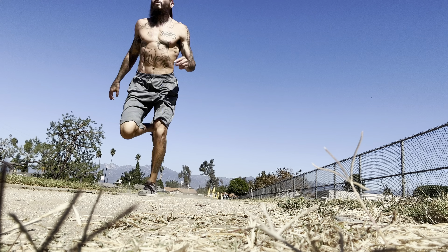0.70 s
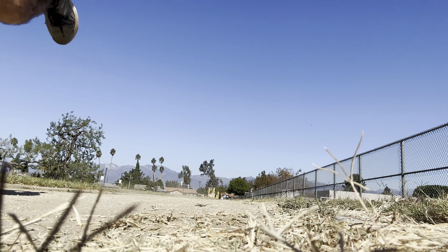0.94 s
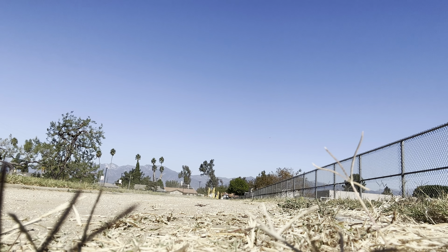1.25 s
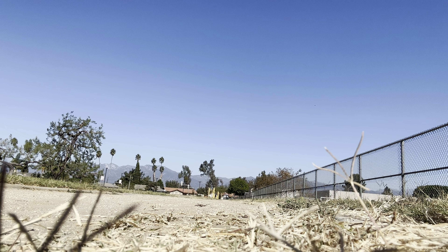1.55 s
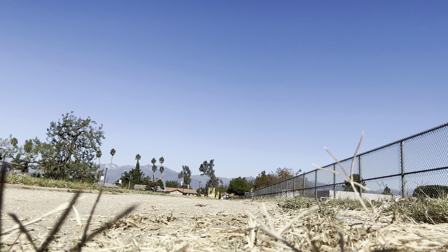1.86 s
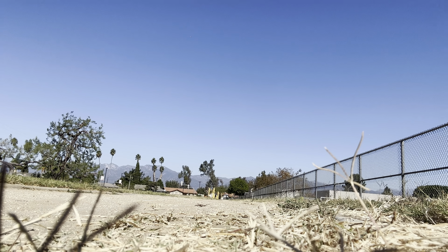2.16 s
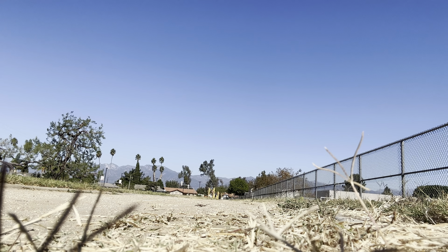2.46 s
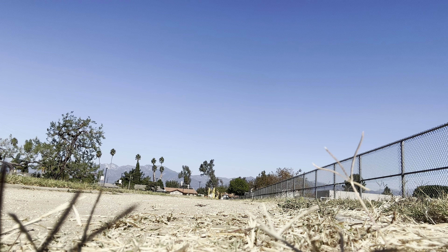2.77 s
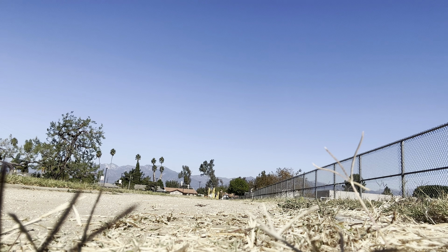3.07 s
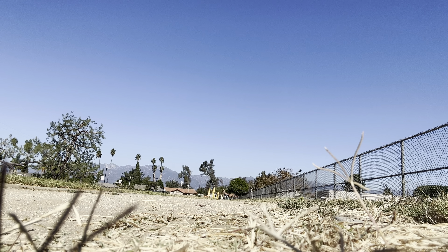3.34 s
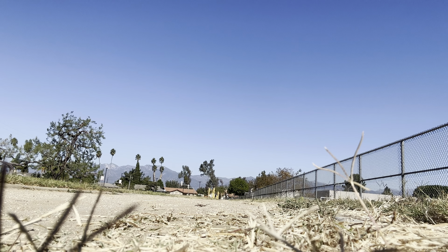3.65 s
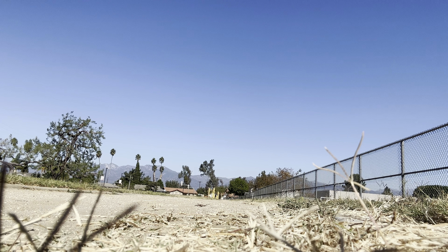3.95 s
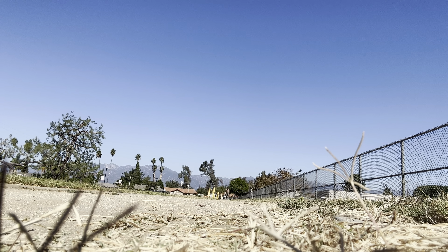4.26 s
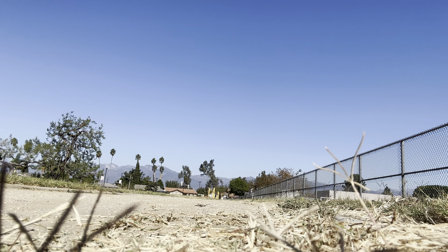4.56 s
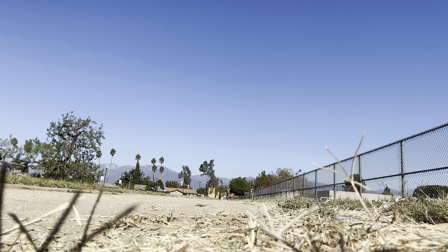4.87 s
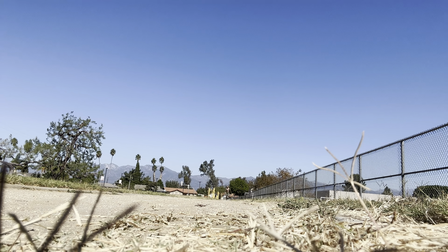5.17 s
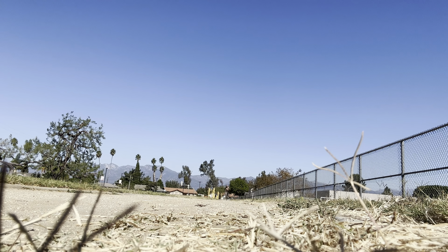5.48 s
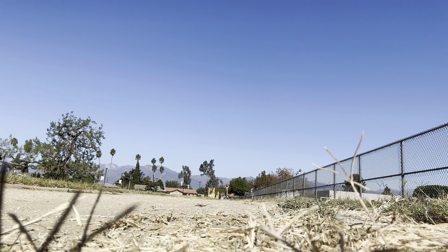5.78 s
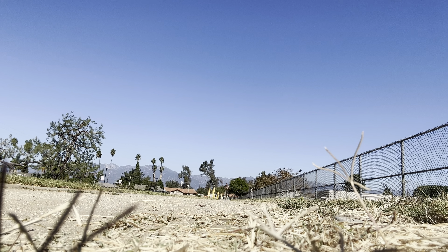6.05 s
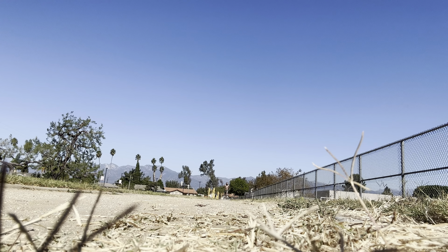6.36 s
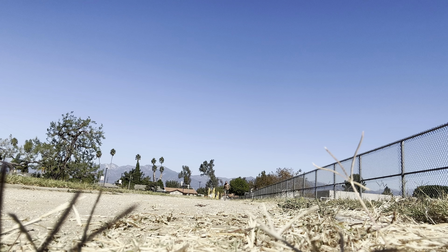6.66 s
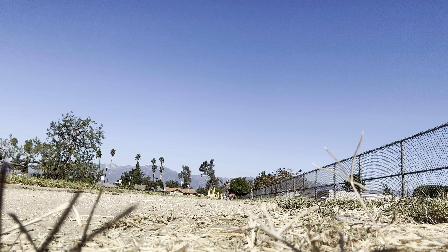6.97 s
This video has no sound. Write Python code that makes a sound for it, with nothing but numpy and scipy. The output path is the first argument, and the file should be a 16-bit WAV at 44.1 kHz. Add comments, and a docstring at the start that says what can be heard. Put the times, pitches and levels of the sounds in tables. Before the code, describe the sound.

Outdoors, far traffic rumbles throughout. Right away a few quick running footfalls grow louder and go by very near the microphone, to the left, each with a thud, a gritty scrape and scattering dirt. They stop suddenly after about a second. A distant bird gives some thin, faint whistles, and the runner is heard again from a long way off, with soft, even steps that gradually strengthen but stay distant.

```python
"""Far traffic rumbles, and at once a sprinter's feet slap past on a dry dirt path, swinging to the left. The
sound breaks off abruptly and the scene changes; a far bird whistles, and the runner approaches again from a
distance. Each footfall is an impact that rings shoe and soil and crushes grit; each push-off is stick-slip
friction. Kicked sand and pebbles patter down. Spreading and ground loss make the far steps faint and dull."""
import sys
import numpy as np
from scipy import signal
from scipy.fft import rfft, irfft, next_fast_len
from scipy.io import wavfile
from scipy.ndimage import map_coordinates

SR = 44100
rng = np.random.default_rng(int(sys.argv[2]) if len(sys.argv) > 2 else 0)


def to_wav(sig):
    """Store sig (one row per channel, or 1-D mono) as 16-bit WAV at the path in sys.argv[1].

    Samples outside -1..1 are clipped; the rate is SR.
    """
    pcm = np.clip(np.atleast_2d(sig), -1, 1) * 32767
    pcm = np.round(pcm).astype(np.int16)
    wavfile.write(sys.argv[1], SR, pcm.T)  # frames by channels


N = 309582
SHOT = 12288  # samples in one short sound
LOCAL_S = (np.arange(SHOT) - SHOT // 2) / SR  # time around its middle


def amp(db):
    """Amplitude ratio: tenfold for every 20 dB."""
    return 10 ** (np.asarray(db) / 20)


def unit(x):
    """Power normalisation to rms 1."""
    return x / np.sqrt(np.mean(x ** 2) + 1e-20)


def burst(x, seconds):
    """Energy normalisation: as much as rms 1 held for the given seconds."""
    return x * np.sqrt(seconds * SR / (np.sum(x ** 2) + 1e-20))


def along(points, hz):
    """Interpolation of (frequency, value) points on a logarithmic frequency axis."""
    frequencies, values = np.transpose(points)
    return np.interp(np.log(hz + 1), np.log(frequencies), values)


def at(rows, s):
    """Linear interpolation of a table's columns at the times s."""
    times, *columns = np.transpose(rows)
    return [np.interp(s, times, column) for column in columns]


def wobble(rate_hz, size=N):
    """Random modulation: a smooth curve through Gaussian knots."""
    knots = rng.standard_normal(int(size * rate_hz / SR) + 4)
    fine = np.linspace(0, len(knots) - 1, 10 * len(knots))
    return np.interp(np.arange(size) * rate_hz / SR, fine, map_coordinates(knots, [fine]))


def filtered(x, response):
    """Linear filtering: the spectrum is multiplied by a frequency response."""
    n = x.shape[-1]
    padded = next_fast_len(n + 2048)
    return irfft(rfft(x, padded) * response(np.fft.rfftfreq(padded, 1 / SR)), padded)[..., :n]


def ring(modes, hz):
    """Modal resonance: second-order band-passes, each squared for steep skirts."""
    return sum((-1) ** k * amp(db) * (2j * hz * width / (pitch ** 2 - hz ** 2 + 2j * hz * width)) ** 2
               for k, (pitch, width, db) in enumerate(modes))


def grains(size, rate_hz, spread_db):
    """Shot noise: clicks at random times and of unequal size, rms 1."""
    chance, sign, level = rng.random(size), rng.standard_normal(size), rng.standard_normal(size)
    return unit((chance < rate_hz / SR) * np.sign(sign) * amp(spread_db * np.clip(level, -2, 2)))


def peak(t, rise_s, fall_s):
    """Exponential growth up to t = 0 and exponential decay after it."""
    return np.exp(-np.abs(t) / np.where(t < 0, rise_s, fall_s))


def spread(pair, spectrum, coherence):
    """Partial coherence: two independent signals mix into one coloured stereo sound of rms 1."""
    angle = lambda hz: np.arccos(np.clip(along(coherence, hz), -1, 1)) / 2
    mid, side = filtered(pair, lambda hz: amp(along(spectrum, hz)) * [np.cos(angle(hz)), np.sin(angle(hz))])
    return unit(np.array([mid + side, mid - side]))


# the two runs along the path: end_s, passing_s, landing_to_scrape_s, traffic_gain_db
RUNS = [(1.328, .98, .127, 5.5), (8, 9.386, .131, 0)]

def run_at(s):
    """Piecewise motion: the run under way at time s."""
    return RUNS[int(s > RUNS[0][0])]


def lasting(s, t):
    """Gating: a sound made at s is heard, t seconds later, only until its run ends."""
    return np.clip((run_at(s)[0] - s - t) / 0.0035, 0, 1)


def runner_at(s):
    """Spherical spreading and ground loss: doublings of 1 m, loss, treble edge, how far past (0-1)."""
    speed_m_per_s, nearest_m, ground_db_per_m = 6.098, 0.52, 0.1888
    past_m = speed_m_per_s * (s - run_at(s)[1])
    range_m = np.hypot(past_m, nearest_m)
    loss_db = 20 * np.log10(range_m) + ground_db_per_m * range_m
    edge_hz = 3193 + 10499 / (1 + range_m ** 1.8) - 37 * range_m  # sinks fast at first, then slowly
    return np.log2(range_m), loss_db, max(edge_hz, 1000), np.clip(past_m / nearest_m, 0, 1)


def grazing(hz, edge_hz):
    """Ground attenuation: sound that skims the soil loses its treble."""
    return 1 / np.sqrt(1 + (hz / edge_hz) ** 11)


# the runner's direction: time_s, left_lead_ms, left_minus_right_db
BEARING = [(.36, 0, 1), (.78, 0.052, 1.5), (.97, 0.331, 4), (1.1, 0.356, 2), (1.31, .51, 11),
           (2.9, -0.052, -3.78)]

def place(out, s, sound):
    """Time and level differences: a sound added at s reaches the nearer side earlier and louder."""
    lead_ms, pan_db = at(BEARING, s)
    where = round(s * SR) + np.arange(SHOT) - SHOT // 2
    inside = (where >= 0) & (where < N)
    hz = np.fft.rfftfreq(SHOT, 1 / SR)
    # diffraction: long waves take a longer way round, but cast no shadow
    phase = 2 * np.pi * hz * lead_ms / 1000 * (1 + 0.49 / (1 + (hz / 750) ** 2))
    shadow_db = pan_db * hz / (hz + 150)
    spectrum = rfft(sound * lasting(s, LOCAL_S))
    for channel, side in enumerate((.5, -.5)):
        heard = irfft(spectrum * amp(side * shadow_db) * np.exp(1j * side * phase))
        out[channel, where[inside]] += heard[inside]


# spectra of the traffic's rumble and of its tyres: frequency_hz, density_db
RUMBLE_SPECTRUM = [(12, -58), (20, -25.5), (24, -18), (35, -13), (45, -3.5), (64, 2), (92, -2), (113, -2),
                   (189, -7.5), (236, -14), (268, -16), (323, -21), (400, -26), (520, -55.5), (880, -120)]
TYRE_SPECTRUM = [(150, -28), (250, -2), (302, -8.5), (404, -6.5), (488, -11), (801, -9.5), (1000, -10.5),
                 (1590, -22.5), (2280, -40), (3050, -47.5), (3270, -48), (3560, -50), (4930, -54),
                 (10100, -53), (15000, -69)]
# left-right likeness of the background: frequency_hz, coherence
AMBIENT_COHERENCE = [(60, 1), (130, 0.876), (290, 0.65), (640, 0.096), (1410, 0.5), (3100, 0.043),
                     (6820, 0.23), (15000, 0.53)]

def traffic():
    """Broadband noise: far traffic blends into a slowly swaying rumble and a dull wash of tyres."""
    (end_s, _, _, first_db), (_, _, _, second_db) = RUNS
    run_db = np.interp(np.arange(N) / SR, [end_s, end_s + 0.0103], [first_db, second_db])
    noise = lambda spectrum: spread(rng.standard_normal((2, N)), spectrum, AMBIENT_COHERENCE)
    rumble_db = -44 + run_db + 1.2 * wobble(6)
    tyre_db = -54 + run_db + 1.2 * wobble(5)
    return amp(rumble_db) * noise(RUMBLE_SPECTRUM) + amp(tyre_db) * noise(TYRE_SPECTRUM)


# a far engine's swell: time_s, relative_level_db
ENGINE_SWELL = [(1.4, -52.5), (6.48, -48.5), (7.0, -38)]

def engine():
    """Amplitude and frequency modulation: a far engine drones on one low, wavering tone."""
    level_db = at(ENGINE_SWELL, np.arange(N) / SR)[0] - 2 + 3.5 * wobble(16)
    pitch_hz = 85 + 5 * wobble(14)
    return amp(level_db) * unit(np.sin(2 * np.pi * np.cumsum(pitch_hz) / SR))


# spectrum of the hiss: frequency_hz, density_db
HISS_SPECTRUM = [(2000, -22), (3500, 2.5), (7000, -9), (9500, 1.5), (12000, -4.5), (13300, -17),
                 (15000, -31)]

def hiss():
    """Stationary noise: a faint, even hiss in the treble."""
    return amp(-90.5) * spread(rng.standard_normal((2, N)), HISS_SPECTRUM, AMBIENT_COHERENCE)


def stony(x, share, t60_s):
    """Convolution with decaying noise: loose stones ring briefly, at new pitches for every contact."""
    t = np.arange(SR // 20) / SR
    tail = rng.standard_normal(len(t)) * amp(-60 * t / t60_s)
    return x + share * signal.fftconvolve(x, tail / np.linalg.norm(tail))[:len(x)]


def sinking(x, octaves):
    """Downward glide: a contact's pitch falls as more and more sole bears on the soil."""
    position = np.cumsum(2 ** (-octaves * np.tanh(LOCAL_S / .008)))
    return map_coordinates(x, [position - position[SHOT // 2] + SHOT // 2], order=1)


# the soil's deep modes: pitch_hz, base_swell_s, weight_db
SOIL_MODES = [(79.5, 0.0059, -1), (62.18, .014, -17.5)]

def soil(t, stretch):
    """Damped oscillation: the ground bounces under the runner; a gentler push stretches the swell."""
    age_s = np.maximum(t, 0)
    bounce = sum(amp(db) * np.sin(2 * np.pi * hz * age_s) * age_s * np.exp(-age_s / (stretch * swell_s))
                 for hz, swell_s, db in SOIL_MODES)
    return filtered(bounce, lambda hz: hz ** 4 / (hz ** 4 + 42 ** 4))  # the bounce carries no deep bass below about 42 Hz


# resonances of a shoe on packed soil: pitch_hz, width_hz, gain_db
THUD_MODES = [(162, 87, -6.5), (311.3, 52, -1.5), (492.5, 150, -9.5)]
SLAP_MODES = [(564, 130, 2.5), (972.5, 200, -1.5), (1470, 500, -19.5)]
# spectrum of crushed grit: frequency_hz, density_db
CRUNCH_SPECTRUM = [(500, -39), (1200, 6.5), (2100, -0.5), (2800, -5.5), (3400, -2.5), (4200, -9.5),
                   (5300, -5.5), (6600, -17), (12000, -15.5), (15000, -30)]
# strides, levels before distance loss: contact_s, heel_to_sole_s, landing_db, push_off_db
STRIDES = [(.076, 0.0082, -14, -21), (.355, 0.0098, -11.5, -26), (.649, 0.00976, -14, -26),
           (.968, .014, -17.5, -30.5), (1.317, 0.01883, -23.5, -33.5), (2.91, .008, -23.5, -30),
           (3.18, 0.0105, -23.5, -20), (3.44, 0.00446, -12.5, -21.5), (3.698, 0.011, -20.5, -35.5),
           (3.978, 0.0035, -19, -26.5), (4.232, 0.0041, -20.5, -42), (4.489, .003, -23.5, -34.5),
           (4.77, .006, -26.5, -33), (4.993, 0.0047, -19.5, -31), (5.255, .005, -22, -37.5),
           (5.493, 0.0083, -23.5, -30.5), (5.753, 0.00324, -21, -36.5), (6.015, 0.012, -22.5, -24.5),
           (6.268, .009, -15.5, -34), (6.524, 0.0121, -18.5, -27), (6.779, .0065, -18, -34.5)]

def footfalls():
    """Impact excitation: the heel touches, the sole slaps and crushes grit, soil gives, grit skitters."""
    out, t = np.zeros((2, N)), LOCAL_S
    for k, (s, roll_s, landing_db, _) in enumerate(STRIDES):
        doublings, loss_db, edge_hz, past = runner_at(s)
        dull_db = 8.5 * past  # landings are duller once the runner has passed
        heel = peak(t + roll_s, .001, 0.0021)
        touching = t > -roll_s - .001
        press_s = .35 * min(roll_s, .012)  # a flat landing is a sharper one
        weight = touching * (0.1493 * heel + np.minimum(peak(t + 0.0021, 1.6 * press_s, 0.0015), .6))
        thud = filtered(weight * grains(SHOT, 5000, 2.6), lambda hz: ring(THUD_MODES, hz))
        sole = touching * (0.43 * heel + peak(t, 1.5 * press_s, 0.0046)) * grains(SHOT, 3500, 4.6)
        slap = filtered(sole, lambda hz: ring(SLAP_MODES, hz) * grazing(hz, edge_hz))
        crush = touching * (0.47 * heel + peak(t + 0.00091, 1.707 * press_s, 0.005))
        stones = stony(crush * grains(SHOT, 3700, 1.0), share=0.18, t60_s=0.025)
        crunch = filtered(stones, lambda hz: amp(along(CRUNCH_SPECTRUM, hz)) * grazing(hz, edge_hz))
        patter = touching * peak(t - .028, 0.026, 0.021) * grains(SHOT, 2500, 4.6)
        skitter = filtered(patter, lambda hz: ring([(2825, 2300, 0)], hz) * grazing(hz, 0.99 * edge_hz))
        layers = [(thud, 2.5 - 1.5 * doublings + dull_db - 0.5 * (-1) ** k),  # one foot is heavier
                  (sinking(slap, octaves=.3), 0),
                  (crunch, -5 - 2.8 * doublings - dull_db),
                  (soil(t - .0095, stretch=1), -1.1 - 2.2 * doublings),
                  (skitter, -23 - doublings)]
        place(out, s, amp(landing_db - loss_db) * sum(amp(db) * burst(x, 0.01983) for x, db in layers))
    return out


def shower(t, swell_s, linger_db, settle_s):
    """Two-stage decay: a spray swells, drops quickly and leaves a thin trickle."""
    return np.maximum(peak(t, swell_s, 0.027), amp(linger_db) * peak(t, swell_s, settle_s))


# spectra of falling grit and sand: frequency_hz, density_db
GRIT_SPECTRUM = [(200, -21.5), (500, 2.5), (1100, 1.5), (1700, 3), (2600, -8), (3300, -8), (4300, -11.5),
                 (5500, -19), (8000, -20.5), (14000, -36)]
SAND_SPECTRUM = [(2500, -34), (5500, -5), (7500, -2), (9500, 1.5), (12200, 2), (13300, -15.5),
                 (15500, -33.5)]
# sprays of kicked-up dirt: thickest_s, swell_s, grit_db, sand_db
SPRAYS = [(.108, 0.0145, -43, -51.5), (0.381, 0.0364, -50, -60.5), (.49, 0.06, -61, -68),
          (.605, 0.0166, -46.5, -54.5), (.654, 0.0284, -36, -42.5), (.745, 0.034, -45.5, -51),
          (.79, 0.027, -49, -42.5), (.977, 0.0075, -41.5, -50), (1.095, 0.09, -53, -51)]

def spray():
    """Superposition of tiny impacts: kicked grit and fine sand patter down in clumps around the runner."""
    n = np.arange(N)
    grit_flow, sand_flow = np.zeros((2, N))
    for s, swell_s, grit_db, sand_db in SPRAYS:
        t = n / SR - s
        grit_flow += amp(grit_db) * shower(t, swell_s, linger_db=-11.5, settle_s=0.13) * lasting(s, t)
        sand_flow += amp(sand_db) * shower(t, swell_s, linger_db=-13, settle_s=0.11) * lasting(s, t)
    fall = lambda rate_hz, spread_db: np.array([grains(N, rate_hz, spread_db) for _ in range(2)])
    grit_flow *= amp(4.5 * wobble(77))
    grit = grit_flow * spread(fall(4300, 3.5), GRIT_SPECTRUM, coherence=[(1000, 1.0), (6000, .6)])
    sand_flow *= amp(1.2 * wobble(79))
    sand = sand_flow * spread(fall(12000, 2), SAND_SPECTRUM, coherence=[(8000, 0.23)])
    lead_samples = at(BEARING, n / SR)[0] * SR / 1000
    return np.array([map_coordinates(x, [n + side * lead_samples])
                     for x, side in zip(grit + sand, (.5, -.5))])


# spectrum of a sole dragged over grit: frequency_hz, density_db
SCRAPE_SPECTRUM = [(120, -26.5), (350, -3.5), (700, -1.5), (1200, 3.5), (2100, -3), (2700, -10.5),
                   (3500, -4.5), (6500, -16.5), (12000, -21), (15000, -40.5)]

def push_offs():
    """Stick-slip friction: the toe scrapes grit backwards ever harder, then flicks off the ground."""
    out, t = np.zeros((2, N)), LOCAL_S
    for contact_s, _, _, push_db in STRIDES:
        s = contact_s + run_at(contact_s)[2]
        doublings, loss_db, edge_hz, past = runner_at(s)
        # once past, the sole faces the listener: brighter and snappier
        tilt_db_per_octave = 0.04 - doublings + 4.5 * past
        flick_db = push_db - loss_db - 4.5 + 9 * past
        colour = lambda hz: amp(along(SCRAPE_SPECTRUM, hz) + tilt_db_per_octave * np.log2(hz + 1))
        slips = peak(t, 0.014, .0085) * amp(1.7 * wobble(260, SHOT))  # the sole catches and lets go
        stones = stony(slips * grains(SHOT, 1800, 1.6), share=0.91, t60_s=0.049)
        scrape = filtered(stones, lambda hz: colour(hz) * grazing(hz, edge_hz))
        place(out, s, amp(push_db - loss_db) * burst(scrape, 0.0394))
        toe = peak(t, 0.0065, 0.0016) * grains(SHOT, 2700, 11.0)
        shoe = lambda hz: 2.45 * ring(THUD_MODES, hz) + ring(SLAP_MODES, hz) * grazing(hz, edge_hz)
        flick = sinking(filtered(toe, shoe), octaves=0.57)
        rebound = soil(t - .009, stretch=1.2)
        place(out, s + .021, amp(flick_db) * (burst(flick, 0.0183) + .7 * burst(rebound, 0.013)))
    return out


# single pebbles landing: impact_s, pitch_hz, level_db
PEBBLES = [(.564, 3593, -58.5), (.679, 2980, -52.5), (.688, 3400, -55), (.747, 1690, -33),
           (.769, 2400, -30.5), (1.014, 3000, -33.5), (1.018, 2900, -55)]

def pebbles():
    """Heavily damped resonance: each thrown pebble lands with a short, dry tick."""
    out = np.zeros((2, N))
    for s, pitch_hz, db in PEBBLES:
        knock = stony(peak(LOCAL_S, .0002, .0005) * rng.standard_normal(SHOT), share=.6, t60_s=.015)
        mode = [(pitch_hz, .25 * pitch_hz, 0)]
        tick = filtered(knock, lambda hz: ring(mode, hz) * grazing(hz, 2 * pitch_hz))
        place(out, s, amp(db) * burst(tick, .003))
    return out


# a far bird's whistles: middle_s, length_s, pitch_hz, glide_octaves, level_db
WHISTLES = [(2.208, 0.053, 3280, -.02, -70.5), (3.26, 0.0915, 2470, -.04, -79.5),
            (4.205, 0.079, 2520, .16, -78), (4.259, 0.07, 2510, -0.17, -70)]

def bird():
    """Frequency glides: thin whistles, blurred by distance into a random flutter of pitch and level."""
    out = np.zeros((2, N))
    for s, length_s, pitch_hz, glide_octaves, db in WHISTLES:
        progress = np.clip(LOCAL_S / length_s, -.5, .5)
        hz = pitch_hz * 2 ** (glide_octaves * progress + 0.025 * wobble(300, SHOT))
        swell = amp(db + 2.92 * wobble(70, SHOT)) * np.cos(progress * np.pi)
        place(out, s, swell * np.sin(2 * np.pi * np.cumsum(hz) / SR))
    return out


# overall level, lower for the first run and dipping briefly as it ends: time_s, gain_db
OVERALL_GAIN = [(1.321, -5.5), (1.326, -11.5), (1.342, -5), (1.365, 0)]

def scene():
    """Superposition on open ground: the sources add without echoes."""
    runner = footfalls() + push_offs() + pebbles() + spray()
    surroundings = bird() + traffic() + engine() + hiss()
    return amp(at(OVERALL_GAIN, np.arange(N) / SR)[0]) * (runner + surroundings)


def record(dry):
    """Band limiting and saturation: the deepest bass thins, peaks round off, the top treble is cut."""
    low_cut_hz, top_hz = 28, 15650
    high_pass = lambda ratio: (1j * ratio) ** 2 / (1 + 1j * ratio - ratio ** 2)
    thinned = filtered(dry, lambda hz: high_pass(hz / low_cut_hz))
    rounded = thinned / (1 + thinned ** 8) ** (1 / 8)
    return filtered(rounded, lambda hz: hz < top_hz)


dry = scene()
out = record(dry)
to_wav(out)
```